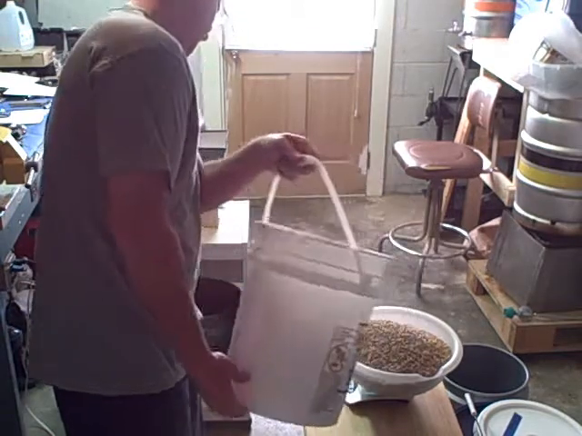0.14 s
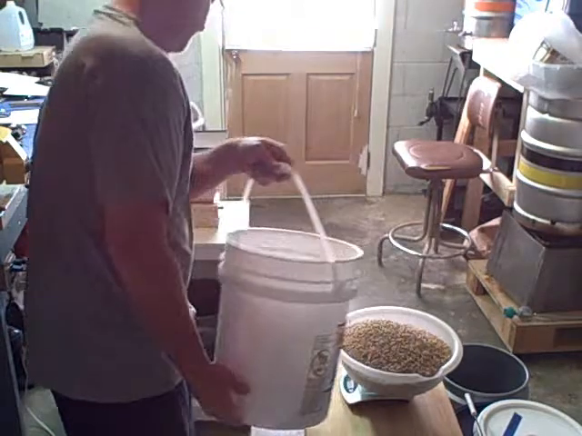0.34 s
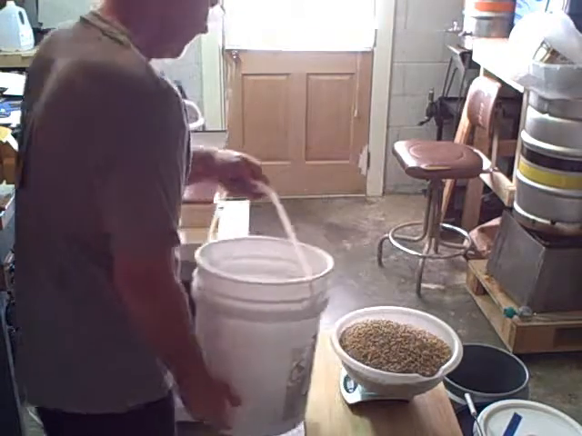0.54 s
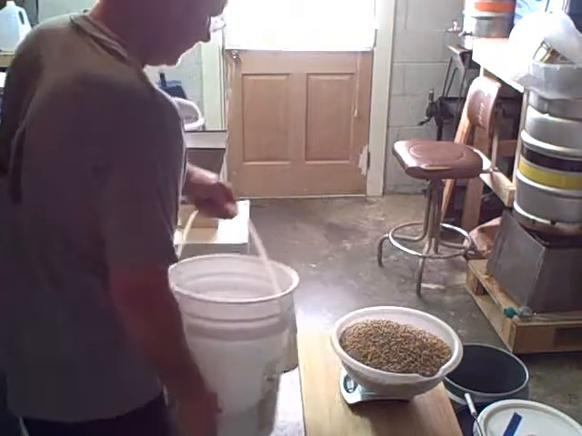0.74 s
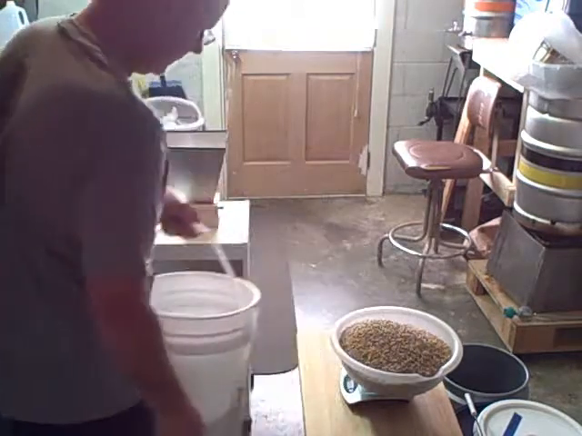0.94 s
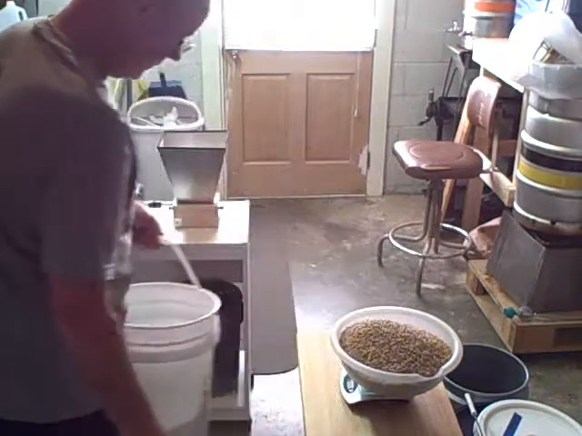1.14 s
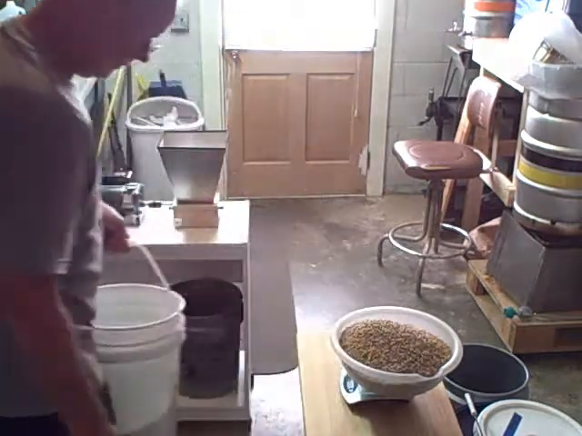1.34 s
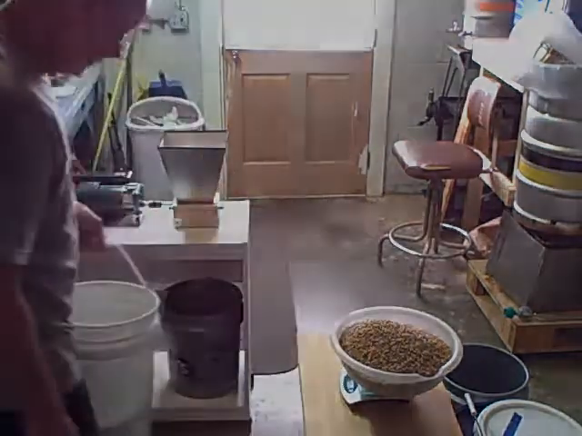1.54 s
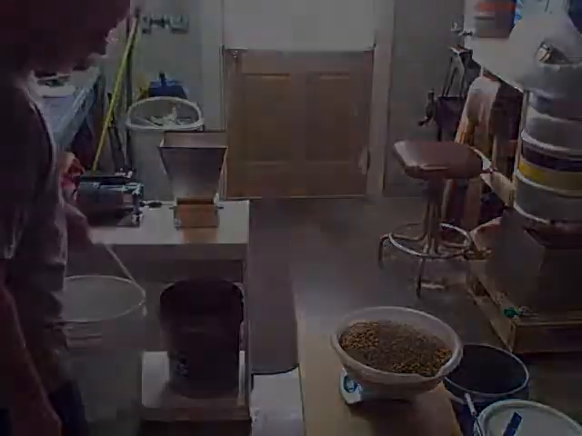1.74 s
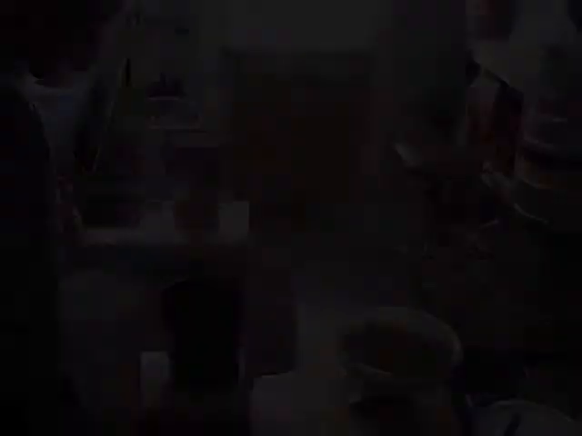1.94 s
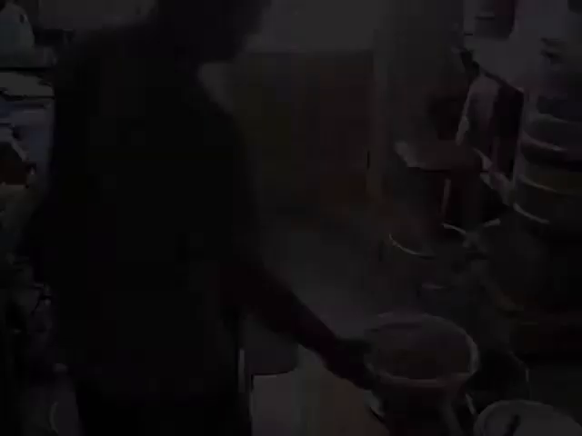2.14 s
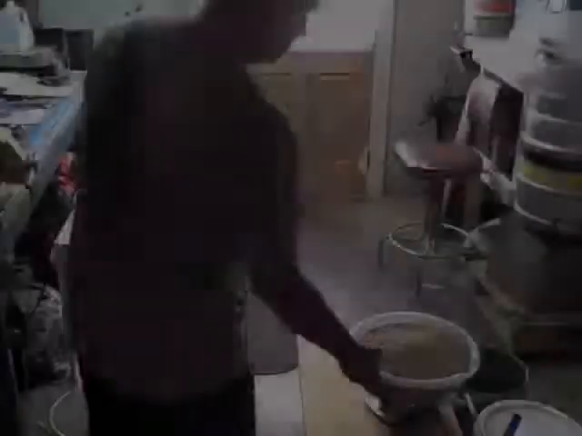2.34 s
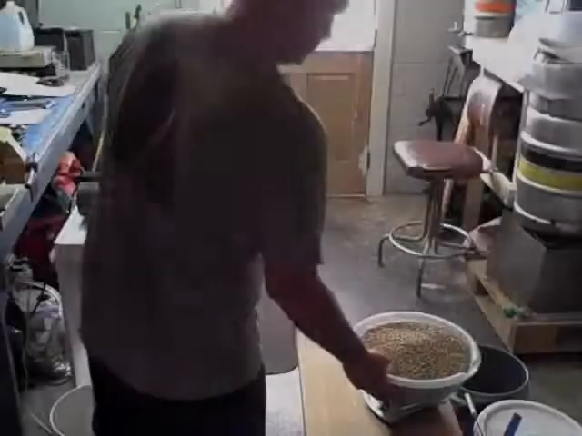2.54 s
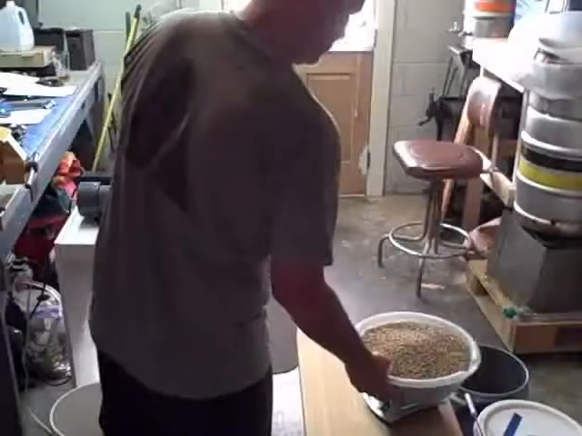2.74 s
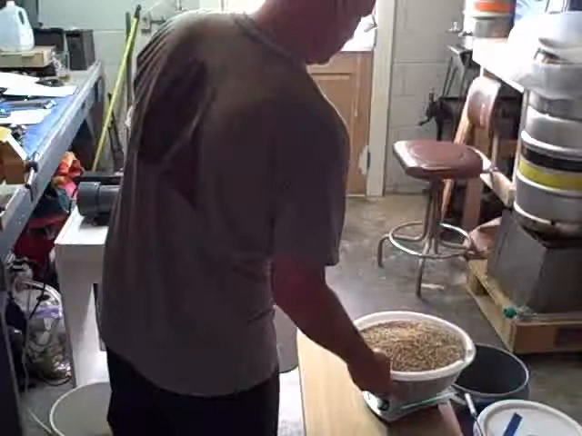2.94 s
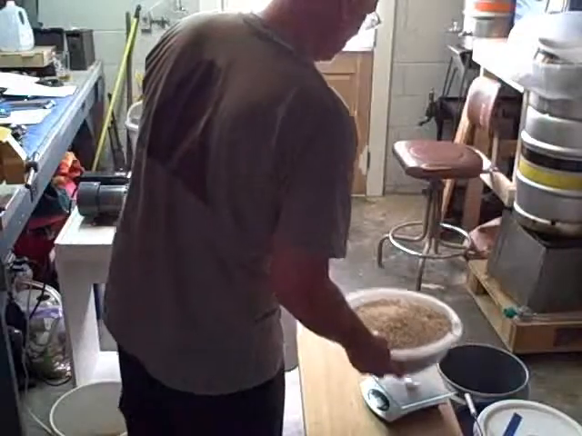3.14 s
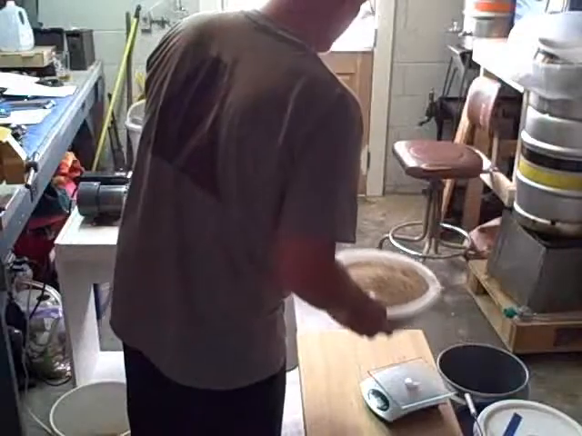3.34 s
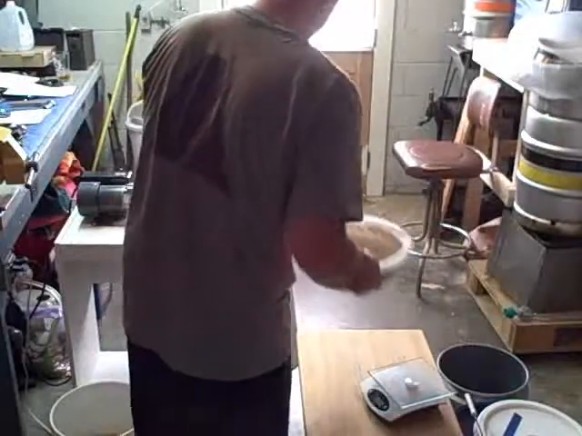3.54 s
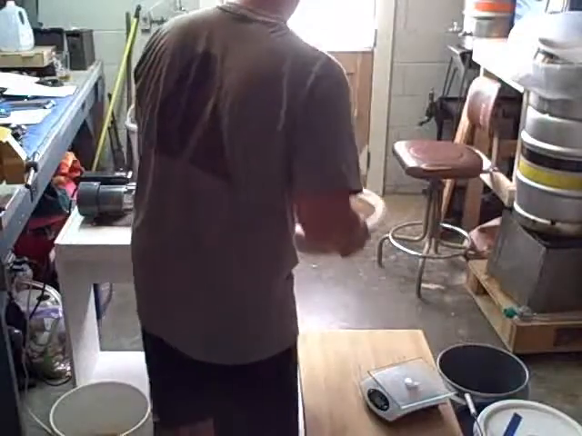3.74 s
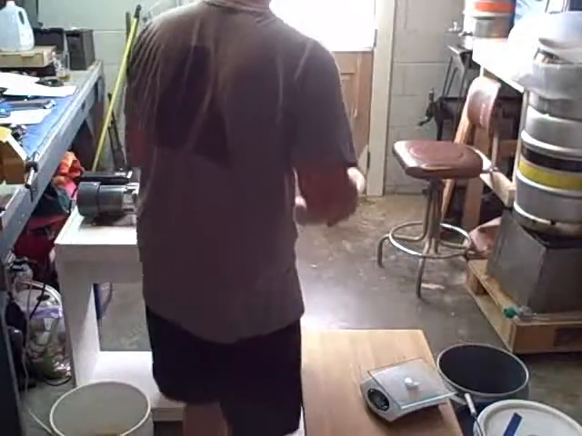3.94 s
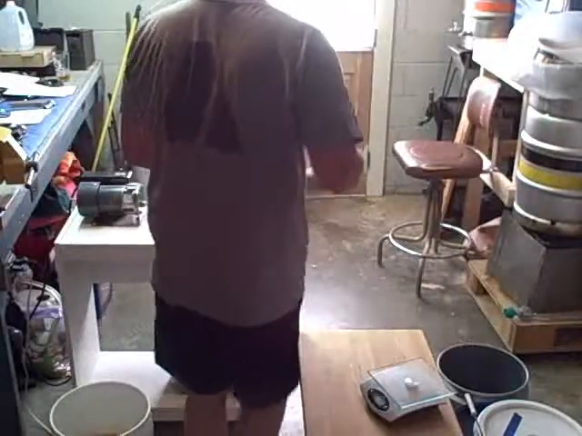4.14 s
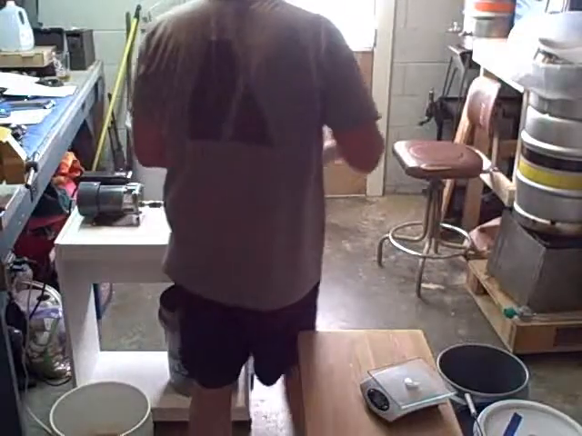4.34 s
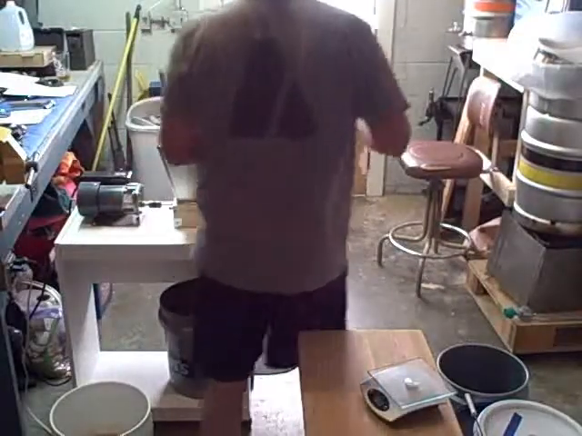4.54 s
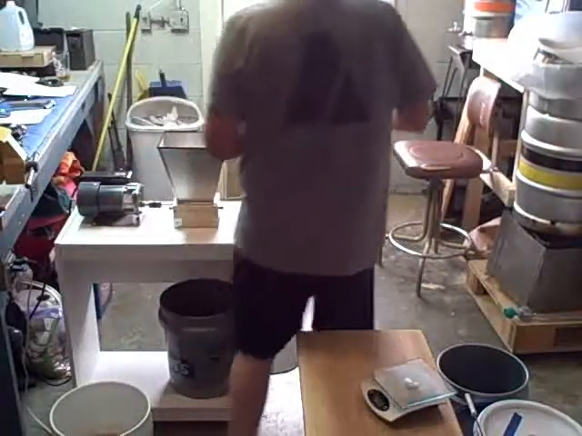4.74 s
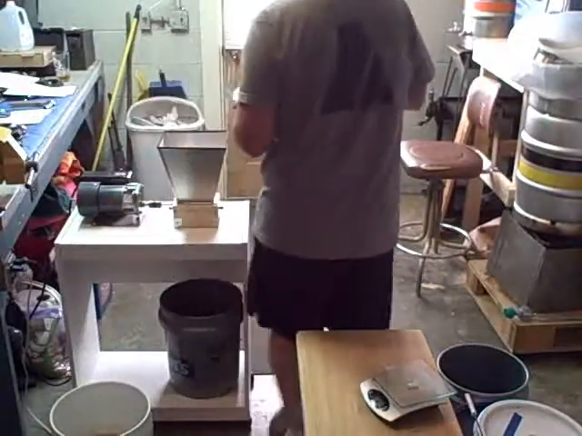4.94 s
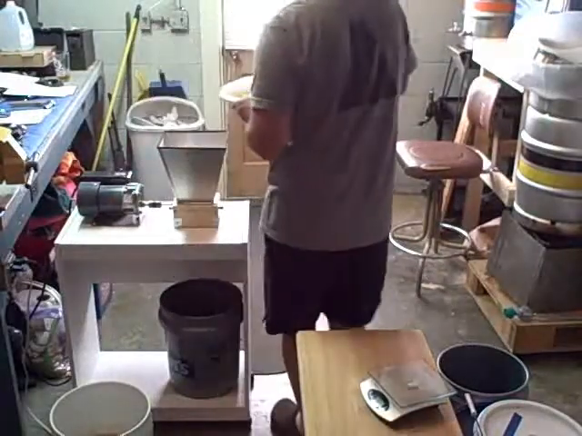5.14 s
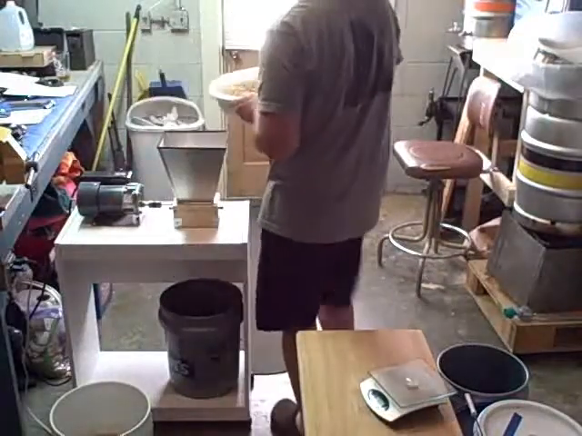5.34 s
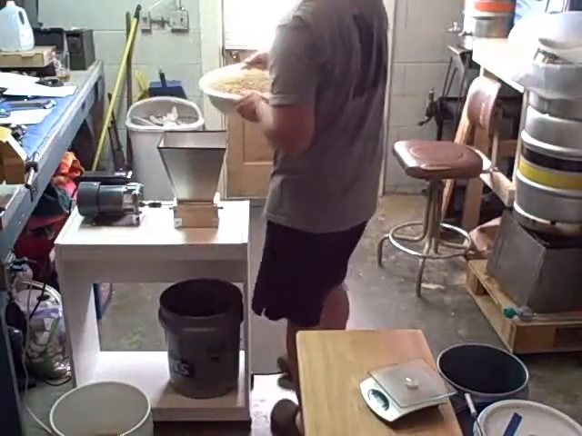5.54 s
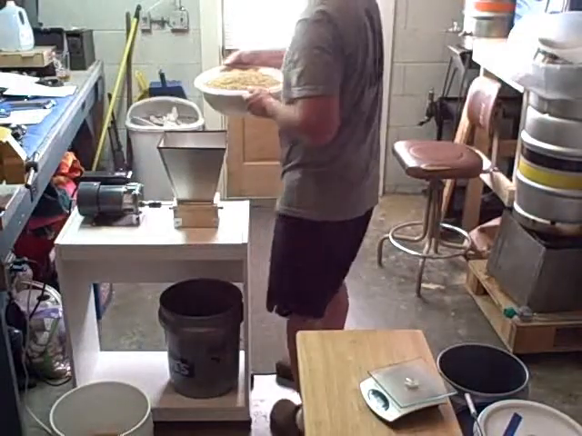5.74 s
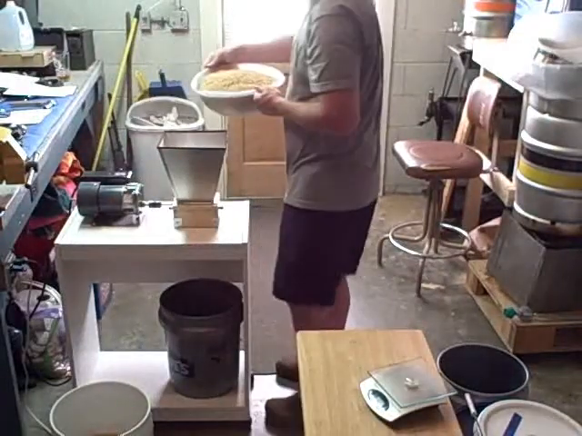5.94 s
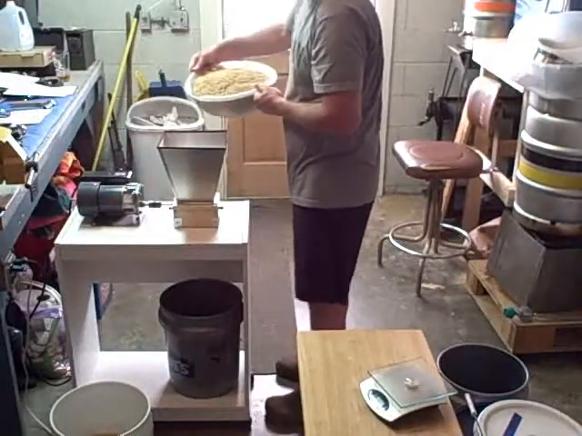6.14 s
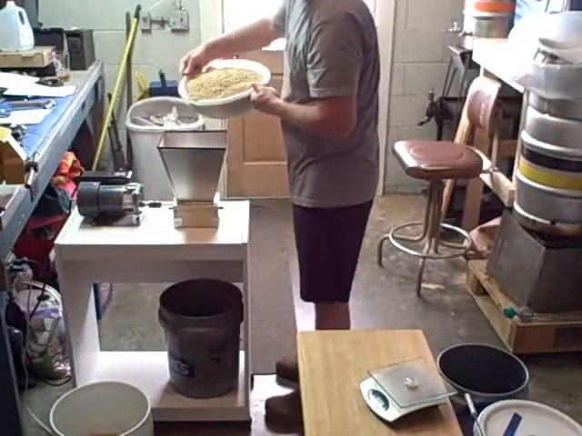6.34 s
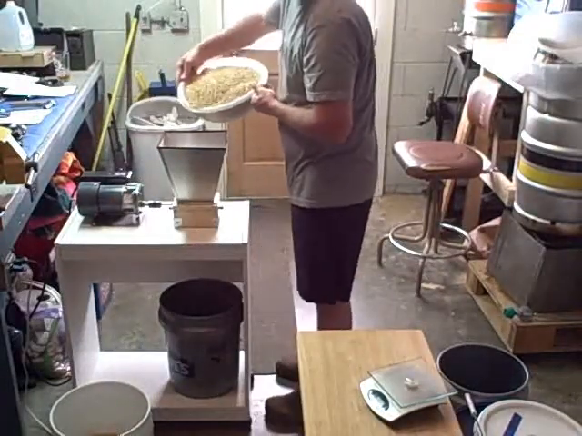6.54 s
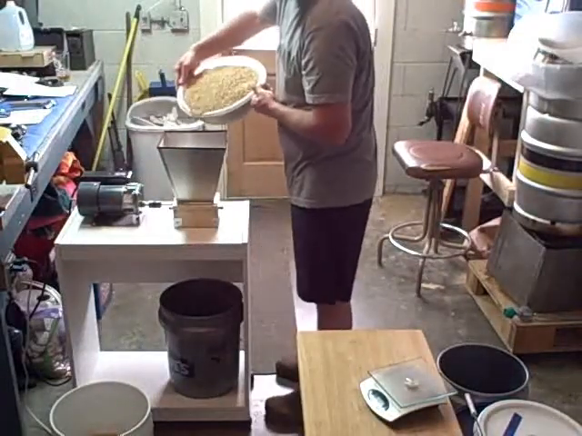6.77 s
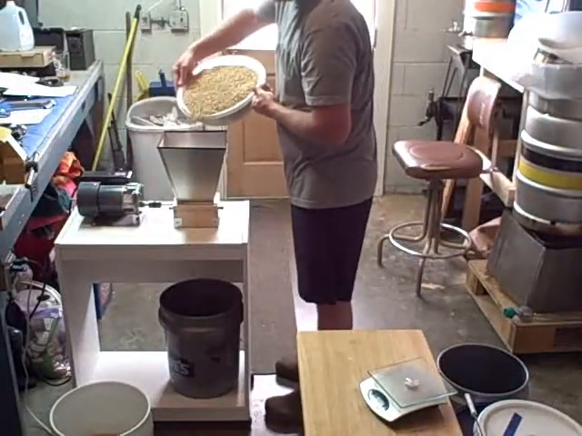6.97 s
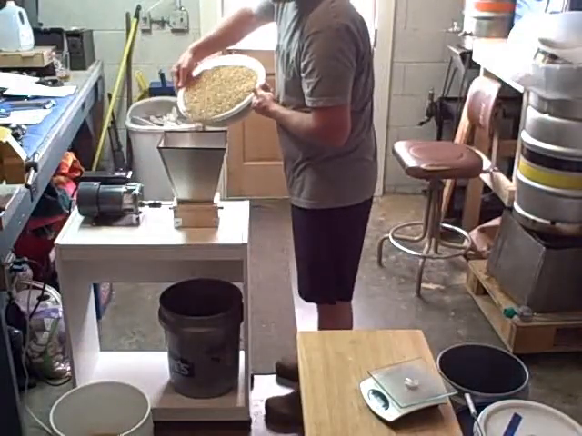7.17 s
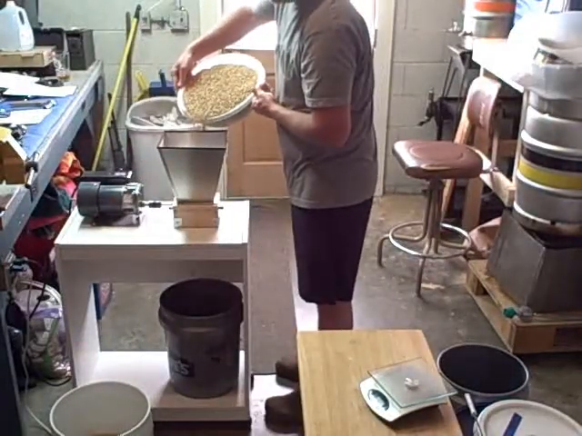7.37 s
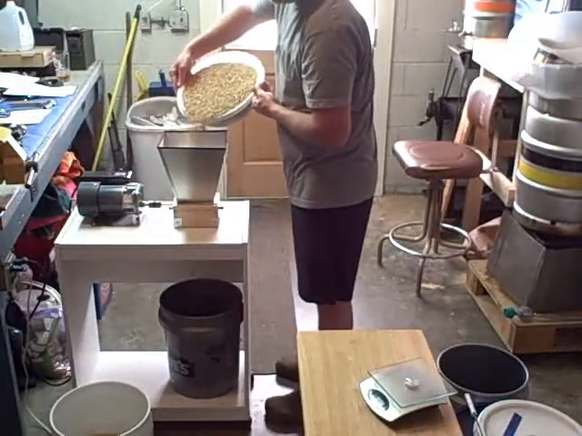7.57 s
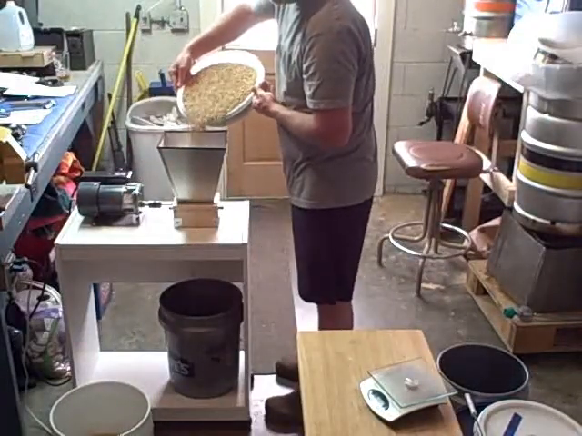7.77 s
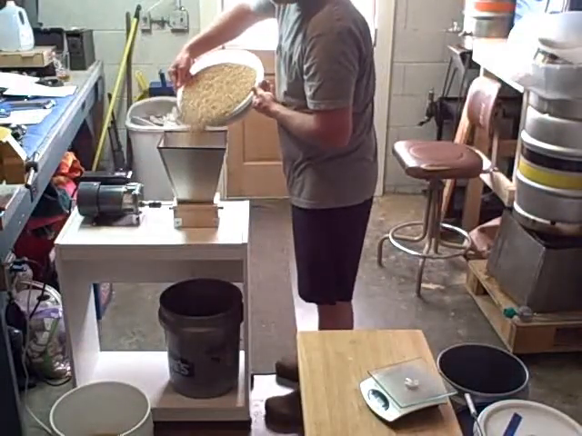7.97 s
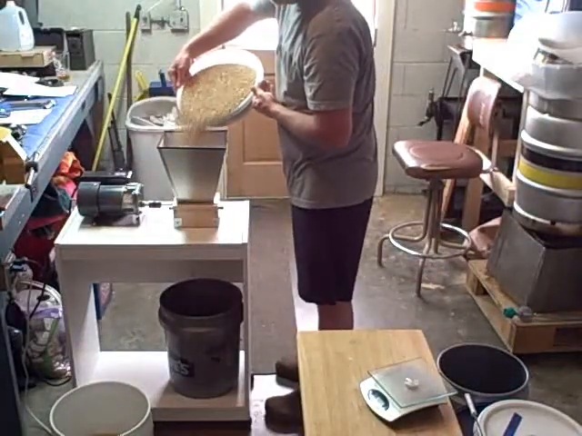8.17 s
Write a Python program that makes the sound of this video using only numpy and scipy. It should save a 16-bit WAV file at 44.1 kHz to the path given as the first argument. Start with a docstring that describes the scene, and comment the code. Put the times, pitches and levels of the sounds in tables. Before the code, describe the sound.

An electric grain mill crunches barley with a bright rattle, cuts abruptly to humming empty rollers, then loud grain pours into a metal hopper.

```python
"""A small workshop, where an electric roller mill runs a few steps away, heard in mono.
Bursting barley kernels ring its frame and shower into a bucket until a hard cut at 2.152 s.
Then the rollers run empty: mains hum, shaft rattle and a swish at each roller turn, all tones and filtered noise.
Someone carries a bowl of grain over, with noise-burst scuffs and ticks and a chirping sole,
and pours it into the sheet-metal hopper, where random blows ring the modes of the metal."""
import sys
import numpy as np
from scipy import signal
from scipy.fft import rfft, irfft
from scipy.io import wavfile

SR = 44100
rng = np.random.default_rng(int(sys.argv[2]) if len(sys.argv) > 2 else 0)


def transcribe(u):
    """Save the signal u as a 16-bit wav file named by the first command-line argument.

    u: samples, shape (n,) or (channels, n), limited to [-1, 1]; the rate is SR.
    q: integer samples, one column per channel.
    """
    v = np.clip(np.atleast_2d(u).T, -1, 1)
    q = np.round(v * 32767).astype(np.int16)
    wavfile.write(sys.argv[1], SR, q)


N = 362061
TIME = np.arange(N) / SR
BINS = np.fft.rfftfreq(N, 1 / SR)

CUT_S = 2.152  # hard cut from the loaded to the empty mill
MAINS_HZ, SHAFT_HZ = 60, 29.98
ROLLER_HZ, ROLLER_RUB_S = 2.965, 2.295  # turns per second, and a moment of strongest rubbing
CUTOFF_HZ = 15480  # upper cutoff of the whole scene's sound

# Levels inside spectra and mode tables are relative: each layer is normalised before its own gain.
# magnetic hum; only the rows above the first are used: multiple of twice the mains, level/dB
HUM_HARMONICS = [(1, 0), (2, -11.5), (3, -12.5), (4, -12.5), (5, -18), (6, -26), (7, -21)]
# the hum's overtones shift as the person walks past the motor: t/s, level/dB before load
OVERTONE_LEVEL = [(2.2, -48), (3.5, -48.5), (4.2, -48.5), (4.9, -46.5), (5.6, -49.5), (6.3, -49),
                  (7.0, -50)]
# whine of the drive, before waver and load: f/Hz, level/dB rms
DRIVE_WHINE = [(420, -78), (690, -58), (720, -61.5), (734, -69), (780, -69.5), (840, -72), (975, -66.5),
               (1200, -68), (1380, -80), (1620, -75.5), (1680, -77), (1800, -72.5), (2100, -69.5),
               (2220, -72), (2250, -78)]
# shaking of the bench: f/Hz, level/dB per Hz
RUMBLE_SPECTRUM = [(10, -45), (26, -14), (36, 1.5), (47, 0), (60, 1.5), (82, 5), (97, -7), (135, -8),
                   (165, -6.5), (200, -29.5), (300, -51)]
# the motor's fan: f/Hz, level/dB per Hz
FAN_SPECTRUM = [(150, -11), (230, 4.5), (290, -5.5), (335, 1.5), (450, 0), (505, 4.5), (560, -2), (900, 1),
                (1080, -4.5), (1250, -1), (1420, -9.5), (2500, -16), (7000, -21), (15000, -48)]
# buzz of the turning shaft: f/Hz, level/dB per Hz
BUZZ_SPECTRUM = [(100, -2), (250, -3.5), (1200, -1.5), (1500, -13.5), (2150, 1.5), (2600, -33), (6000, -31)]
# load on the motor as fresh grain reaches the rollers: t/s, share 0-1
REFILL_LOAD = [(7.2, 0), (7.6, 1), (8.2, 1)]
# modes of the bench under the loaded mill: f/Hz, width/Hz, level/dB
BENCH_MODES = [(164, 4, 0), (174, 6, -5)]

# how hard the rollers are fed: t/s, level/dB
FEED_LEVEL = [(0.0, -44.5), (0.3, -44.5), (0.73, -42), (0.82, -45.5), (1.12, -44.5), (1.6, -42.5),
              (1.97, -43), (2.08, -41.3)]
# sharp cracks of the kernels: f/Hz, level/dB per Hz
CRACK_SPECTRUM = [(400, -11), (1000, -28), (1130, -6), (1270, 6), (1420, -5), (1650, -2.5), (2700, 1.5),
                  (4000, -4), (5400, -4.5), (7000, -17), (15000, -14.5)]
# low crunch of the kernels: f/Hz, level/dB per Hz
CRUNCH_SPECTRUM = [(190, -37), (250, -10.5), (330, -12), (410, -3.5), (490, -17.5), (640, 0), (740, -5),
                   (820, 2.5), (900, -1), (1050, -6.5), (1300, -24), (3000, -53)]
# grist showering into the bucket: f/Hz, level/dB per Hz
GRIST_SPECTRUM = [(2500, -13.5), (6000, -4), (9300, -2), (11000, -3.5), (13500, -2), (15500, -5)]
# modes of the loaded roller frame: f/Hz, width/Hz, level/dB
FRAME_MODES = [(1893, 90, 3.5), (2116, 130, 3.5), (2264, 83, 5), (3446, 120, -3)]
# brief swells and dips of frame ring and low crunch: t/s, change of ring/dB, change of crunch/dB
GRIND_SWELLS = [(.24, -6, 4.5), (.53, -4, 2.5), (.61, -1, -0.5), (.91, 7.5, 6), (1.189, 5, 2),
                (1.29, 6.5, 2.5), (1.62, 5.5, -2), (1.91, 3, 2.5)]
SWELL_S = 0.027  # half the time a swell or dip takes to pass
TURN_DB, TURN_PEAK_S = 0.15, 0.3  # the rollers bite harder once a turn
CRACK_DB, FRAME_DB, CRUNCH_DB, GRIST_DB = -0.5, -1.35, -1.5, -4  # each layer against its feed
CRUNCH_DB_PER_S = -1.5  # the low crunch fades, so the grind grows brighter
GRIST_STEADY_DB, GRIST_FOLLOWS = -42.5, 0.66  # the shower follows the feed only in part
GUSH_S, GUSH_WIDTH_S, GUSH_DB = 0.68, 0.15, 4  # one thicker fall of grist

# rubbing of the empty rollers: f/Hz, level/dB per Hz
RUB_SPECTRUM = [(1500, -0.5), (2800, 1), (3800, -2.5), (5400, -3), (6500, -11), (7700, -8), (11000, -11.5),
                (12500, -11), (15500, -14.5)]
# strength of all empty-roller sounds, before their roller-turn swing: t/s, level/dB
EMPTY_LEVEL = [(2.15, -57), (4.0, -58), (5.1, -54.5), (7.0, -53.5)]
# faint sizzle of the roller bearings: f/Hz, width/Hz, level/dB
BEARING_MODES = [(11620, 260, -2), (11950, 260, 5)]
# housing resonances that the shaft rattles: f/Hz, width/Hz, level/dB
HOUSING_MODES = [(1200, 43, 6), (1979, 87, 3), (2086, 94, 12.5)]

# shoes and grain sliding in the bowl: t/s of the peak, rise/s, fall/s, level/dB, centre f/Hz, spread/octaves
SCUFF_EVENTS = [(3.62, .04, 0.1, -66, 8000, 1.4), (4.391, 0.014, 0.029, -54, 7500, 1.4),
                (4.99, 0.031, 0.045, -58, 2600, .35), (5.059, .05, 0.057, -55.5, 7000, 1.4),
                (5.145, 0.069, 0.03, -49.5, 9500, 1.6), (5.67, .05, 0.044, -63, 6030, 1.4),
                (5.93, 0.051, 0.24, -58.5, 7000, 1.4), (6.65, 0.032, 0.021, -55, 3170, .9),
                (6.808, .04, 0.11, -51.5, 5300, 1.3), (6.97, .06, 0.078, -66, 5000, 1.4)]
# ticks of the bowl and of the first kernels to land: t/s, peak level/dB before the room, centre f/Hz
TICK_EVENTS = [(2.776, -47, 6800), (2.865, -42, 5940), (3.582, -41, 9850), (5.812, -41, 4500),
               (6.778, -37, 5000), (6.810, -36, 7000), (7.091, -22, 5940), (7.109, -31, 7000),
               (7.127, -12.5, 8000)]
# a sole chirps on the concrete: f/Hz, width/Hz, level/dB
SOLE_MODES = [(4150, 450, 0), (4700, 350, -1), (7000, 500, -3), (8200, 800, -6)]

# hopper modes: f/Hz, width/Hz, level/dB
HOPPER_MODES = [(690, 30, -6), (932, 32, -7.5), (2414, 19, 1.2), (3308, 24, -1.5), (4190, 90, -12),
                (4670, 95, -6.5), (4928, 42, -4.5), (5280, 100, -10), (6530, 190, -8), (7340, 60, -11),
                (7795, 60, -4.5), (8335, 50, -2.5), (9320, 280, -6.5), (10400, 130, -8.5),
                (11000, 95, -6.5), (11205, 55, -2.5), (11485, 38, -6.5), (12230, 130, -1.5),
                (13255, 170, 0), (14490, 160, -5.5)]
# clicks of kernels on the sheet metal: f/Hz, level/dB per Hz
PATTER_SPECTRUM = [(800, -14.5), (2000, -7.5), (3000, -5.5), (3800, -4), (5000, -2.5), (7000, -3),
                   (8700, -3), (10000, -1), (12700, 1.5), (14000, 1), (15500, 0)]
# thud of kernels on the heap: f/Hz, level/dB per Hz
HEAP_SPECTRUM = [(150, -8.5), (230, -7.5), (290, -5.5), (430, 3.5), (800, -2.5), (1080, 5.5), (1400, -1.5),
                 (2200, 2), (3200, -16)]
POUR_S, POUR_DB, POUR_RISE_S, POUR_SAG_DB_PER_S = 7.085, -18.5, 0.051, -1.5  # swells, then slowly thins
HEAP_DB, HEAP_RISE_S = -33.5, 0.1  # the thud grows as a heap forms
BARE_DB, COVER_S, COVER_DB_PER_S = -32.5, 7.69, -12  # low modes fade as the heap covers the metal
LUMPY_DB, LUMPS_HZ = 0.16, 27  # grain leaves the bowl unevenly

# decay of the workshop: f/Hz, t60/s
ROOM_DECAY = [(150, 0.47), (1000, 0.26), (5000, 0.17), (15000, 0.074)]
# the microphone's treble: f/Hz, level/dB
MICROPHONE_TREBLE = [(13500, 0), (14400, 0), (15500, -3.5)]


def amp(db):
    """Decibels to gain."""
    return 10 ** (np.asarray(db) / 20)


def unit(x):
    """Scaled to rms 1."""
    return x / np.sqrt(np.mean(x ** 2) + 1e-20)


def noise():
    """White noise for the whole scene."""
    return rng.standard_normal(N)


def read(points, hz):
    """A spectrum joined by straight lines on a log-frequency axis."""
    f, value = np.transpose(points)
    return np.interp(np.log(hz + 1), np.log(f + 1), value)


def over_time(points):
    """A curve of time joined by straight lines, read at every sample."""
    return np.interp(TIME, *np.transpose(points))


def bump(s, width_s):
    """A smooth swell of height 1 around time s."""
    return np.exp(-((TIME - s) / width_s) ** 2)


def add(mix, s, sound):
    """Mixes a sound in at time s."""
    part = mix[max(round(s * SR), 0):][:len(sound)]
    part += sound[:len(part)]


def drift(hz):
    """Slow random wander of rms 1, with its rate limited softly near hz."""
    return unit(irfft(rfft(noise()) * np.exp(-(BINS / hz) ** 2), N))


def colour(x, spectrum, size=8192):
    """Causal minimum-phase filter with the given spectrum, so that clicks keep their sharp fronts."""
    log_gain = np.log(amp(read(spectrum, abs(np.fft.fftfreq(size, 1 / SR)))))
    response = np.exp(np.conj(signal.hilbert(log_gain)))
    taps = np.fft.ifft(response).real[:size // 2]
    return unit(signal.oaconvolve(x, taps)[:N])


def ring(x, hz, width):
    """One decaying mode, with gain 1 at its peak; a wider mode dies sooner."""
    r = np.exp(-np.pi * width / SR)
    return signal.lfilter([1 - r, 0, r - 1], [1, -2 * r * np.cos(2 * np.pi * hz / SR), r * r], x)


def body(x, modes):
    """An object's modes, all driven by x."""
    return unit(sum(amp(db) * ring(x, hz, width) for hz, width, db in modes))


def impacts(per_s, spread_db):
    """Blows of random time and sign; a spread above zero makes a few much harder than the rest."""
    size = amp(spread_db * np.minimum(rng.exponential(1, N), 4))
    sign = rng.choice([-1., 1.], N)
    return size * sign * (rng.random(N) < per_s / SR)


def hiss(count, centre_hz, octaves):
    """A broad hump of noise."""
    hz = np.fft.rfftfreq(count, 1 / SR)
    hump = 1 / (1 + (np.log2((hz + 1) / centre_hz) / octaves) ** 4)
    return unit(irfft(rfft(rng.standard_normal(count)) * hump, count))


def room(x, wet_db, count=5):
    """Direct sound plus sparse reflections that die sooner in the treble, in patterns that take turns."""
    t = np.arange(SR // 2) / SR
    shape = (count, len(t))
    taps = rng.choice([-1., 1.], shape) * (rng.random(shape) < 1 / 16) * (t > .003)
    hz, s, z = signal.stft(taps, SR, nperseg=256)
    decay = amp(-60 * s / read(ROOM_DECAY, hz)[:, None])
    tails = signal.istft(z * decay, SR, nperseg=256)[1]
    tails /= np.linalg.norm(tails, axis=1, keepdims=True)
    # the reflection patterns crossfade, nine rounds a second
    turn = TIME * 9 - np.arange(count)[:, None] / count
    paths = np.maximum(np.cos(2 * np.pi * turn), 0) ** 2
    paths /= np.linalg.norm(paths, axis=0)
    reflections = signal.oaconvolve(x * paths, tails, axes=1).sum(0)[:N]
    wet = amp(wet_db)
    return (x + wet * reflections) / np.hypot(1, wet)


def motor():
    """Mains hum and drive whine, both weaker under load, over the fan, the shaft's buzz and the shaking bench."""
    load = np.clip((CUT_S - TIME) / .002, 0, 1) + over_time(REFILL_LOAD)
    clock = TIME + 4e-5 * drift(2.8)  # all tones share one slight waver of pitch

    def tone(hz, waver_db):
        """A sine of random phase whose level wavers."""
        sine = np.sin(2 * np.pi * (hz * clock + rng.random()))
        return np.sqrt(2) * sine * amp(waver_db * drift(2.1))

    hum = amp(-39.5) * tone(2 * MAINS_HZ, waver_db=0.85)
    overtones = unit(sum(amp(db) * tone(2 * MAINS_HZ * k, waver_db=0.26 * k) for k, db in HUM_HARMONICS[1:]))
    overtones *= amp(over_time(OVERTONE_LEVEL))
    whine = sum(amp(db) * tone(hz, waver_db=3.5) for hz, db in DRIVE_WHINE)
    rumble = amp(-44.5) * colour(noise(), RUMBLE_SPECTRUM, size=32768)
    fan = amp(-53.0) * colour(noise(), FAN_SPECTRUM)
    shake = amp(-46) * load * body(noise(), BENCH_MODES)
    # the same rough spots pass once a shaft turn: a faint comb of shaft orders
    orders = SHAFT_HZ * np.arange(1, 90)
    phases = np.exp(2j * np.pi * rng.random(len(orders)))
    one_turn = irfft(np.r_[0, amp(read(BUZZ_SPECTRUM, orders)) * phases], 2048)
    turning = np.interp(SHAFT_HZ * clock % 1, np.linspace(0, 1, len(one_turn)), one_turn)
    buzz = amp(-59.5) * unit(turning)
    tones = hum * amp(-4.5 * load) + (overtones + whine) * amp(-7 * load)
    return tones + rumble + fan + buzz + shake


def crushing():
    """Kernels burst between the rollers and ring the frame; grist showers into the bucket."""
    turn_db = TURN_DB * np.cos(2 * np.pi * ROLLER_HZ * (TIME - TURN_PEAK_S))
    feed_db = over_time(FEED_LEVEL) + turn_db
    from_middle_s = np.minimum(TIME, CUT_S) - CUT_S / 2
    frame_db = feed_db + FRAME_DB
    crunch_db = feed_db + CRUNCH_DB + CRUNCH_DB_PER_S * from_middle_s
    for s, ring_db, low_db in GRIND_SWELLS:
        swell = bump(s, SWELL_S)
        frame_db = frame_db + ring_db * swell
        crunch_db = crunch_db + low_db * swell
    grist_feed_db = GRIST_FOLLOWS * feed_db + (1 - GRIST_FOLLOWS) * GRIST_STEADY_DB
    grist_db = GRIST_DB + grist_feed_db + GUSH_DB * bump(GUSH_S, GUSH_WIDTH_S)
    # the same bursts drive every layer
    bursts = impacts(per_s=2500, spread_db=0.0) * amp(1.33 * drift(32))
    falling = bursts + impacts(per_s=7000, spread_db=1.0)
    cracks = amp(feed_db + CRACK_DB) * colour(bursts, CRACK_SPECTRUM)
    crunches = amp(crunch_db) * colour(bursts, CRUNCH_SPECTRUM)
    ringing = amp(frame_db) * body(bursts, FRAME_MODES)
    shower = amp(grist_db) * colour(falling, GRIST_SPECTRUM)
    return room(cracks + crunches + ringing + shower, wet_db=-5.5)


def empty_rollers():
    """The rollers rub once a turn; the coupling knocks the housing once a shaft turn."""
    rub = np.cos(2 * np.pi * ROLLER_HZ * (TIME - ROLLER_RUB_S))
    swish = colour(impacts(per_s=9000, spread_db=2.0), RUB_SPECTRUM) * amp(2.55 * rub)
    sizzle = amp(-13.5) * body(noise(), BEARING_MODES) * amp(2.3 * rub)
    knock_shape = 0.41 + np.exp(-(SHAFT_HZ * TIME % 1) / 0.2)
    knocks = knock_shape * noise() * amp(2.5 * drift(6))
    rattle = amp(-5.0) * body(knocks, HOUSING_MODES) * amp(2.2 * rub)
    return room(amp(over_time(EMPTY_LEVEL)) * (swish + sizzle + rattle), wet_db=-7.5)


def handling():
    """Swelling noise scuffs and dry, fast-decaying ticks as the bowl is lifted, carried and tipped."""
    scuffs, ticks = np.zeros((2, N))
    t = np.arange(-SR // 2, SR // 2) / SR
    for s, rise, fall, db, hz, octaves in SCUFF_EVENTS:
        swell = np.exp(-(t / np.where(t < 0, rise, fall)) ** 2)
        add(scuffs, s - .5, amp(db) * swell * hiss(len(t), hz, octaves))
    scuffs *= amp(2.5 * drift(200))  # gritty flicker
    t = np.arange(1024) / SR
    for s, db, hz in TICK_EVENTS:
        tick = hiss(len(t), hz, octaves=.9) * np.exp(-t / 0.0031)
        add(ticks, s, amp(db) * tick / abs(tick).max())
    return room(scuffs, wet_db=1) + room(ticks, wet_db=-4)


def footstep(s=4.39, decay_s=0.0045, db=-41):
    """One short, gritty chirp of a turning shoe: many small slips ring the sole."""
    slip = (TIME > s) * np.exp(-abs(TIME - s) / decay_s)
    chirp = body(impacts(per_s=6400, spread_db=2), SOLE_MODES)
    return room(amp(db) * slip * chirp, wet_db=0.5)


def pouring(low_modes_hz=3600):
    """Kernels strike the hopper, each at its own spot, and thud on the growing heap."""
    age = np.maximum(TIME - POUR_S, 0)
    flow_db = POUR_SAG_DB_PER_S * age + LUMPY_DB * drift(LUMPS_HZ)
    flow = (1 - np.exp(-age / POUR_RISE_S)) * amp(flow_db)
    patter = amp(POUR_DB) * flow
    heap = amp(HEAP_DB) * flow * (1 - np.exp(-age / HEAP_RISE_S))
    bare = amp(BARE_DB + COVER_DB_PER_S * np.maximum(TIME - COVER_S, 0)) * flow
    hits = impacts(per_s=5500, spread_db=1.5)
    # a random strength per hit and mode stands for the spot that is struck
    modes = [(hz, amp(db) * ring(hits * noise(), hz, width)) for hz, width, db in HOPPER_MODES]
    low_ring = bare * unit(sum(m for hz, m in modes if hz < low_modes_hz))
    high_ring = amp(-4.5) * patter * unit(sum(m for hz, m in modes if hz >= low_modes_hz))
    clicks = amp(-1.0) * patter * colour(hits, PATTER_SPECTRUM)
    thuds = heap * colour(impacts(per_s=4000, spread_db=1.0), HEAP_SPECTRUM)
    return low_ring + high_ring + room(clicks + thuds, wet_db=-4.5)


def scene():
    """The loaded mill, then the empty one, the walk and the pour; the same in both channels."""
    rollers = np.where(TIME < CUT_S, crushing(), empty_rollers())
    mono = motor() + rollers + handling() + footstep() + pouring()
    return np.array([mono, mono])


def record(dry):
    """The microphone's treble droop, then the upper cutoff."""
    heard = irfft(rfft(dry) * amp(read(MICROPHONE_TREBLE, BINS)), N)
    low_pass = signal.firwin(1023, CUTOFF_HZ, window=("kaiser", 9), fs=SR)
    return signal.oaconvolve(heard, low_pass[None], "same", axes=1)


dry = scene()
out = record(dry)
transcribe(out)
```